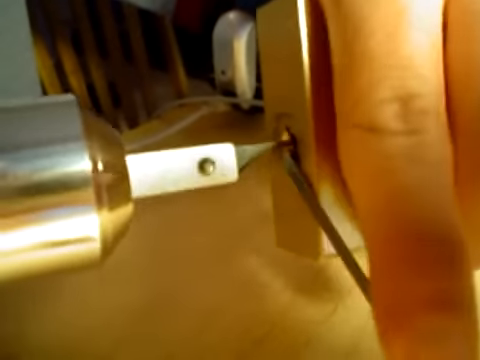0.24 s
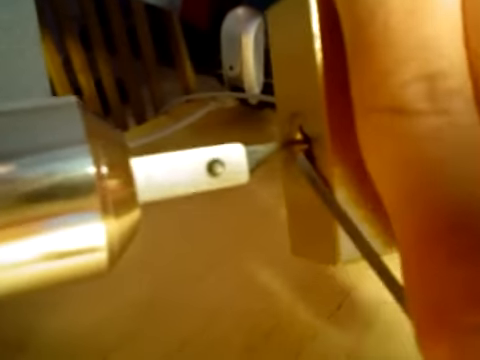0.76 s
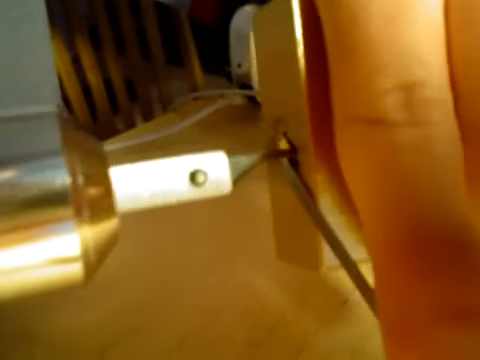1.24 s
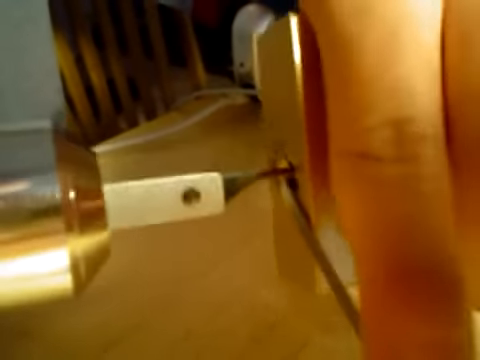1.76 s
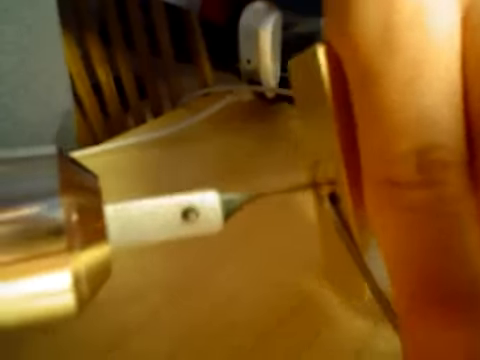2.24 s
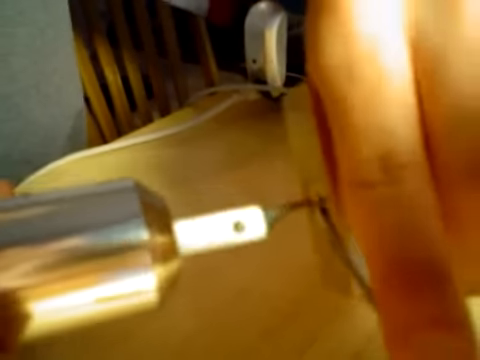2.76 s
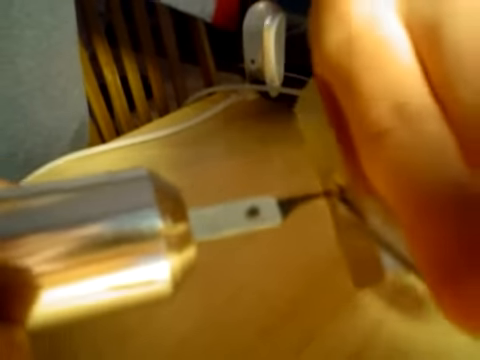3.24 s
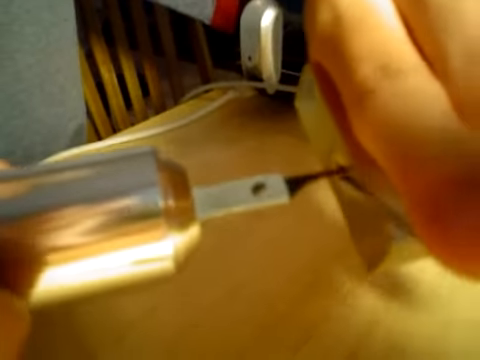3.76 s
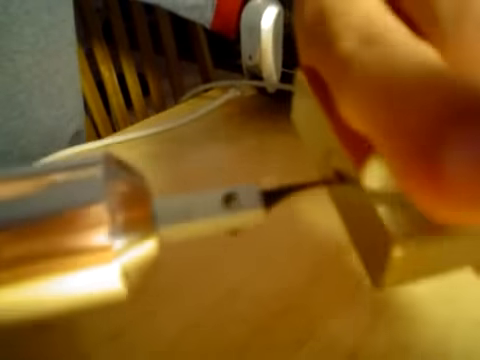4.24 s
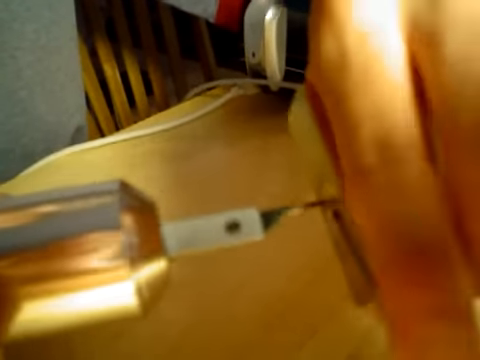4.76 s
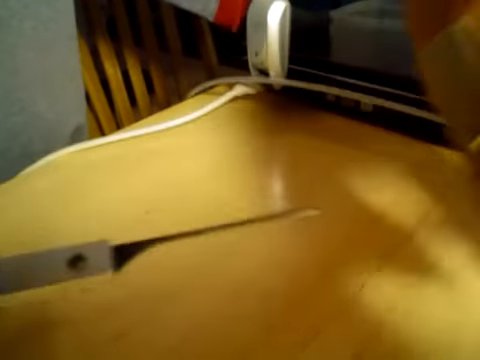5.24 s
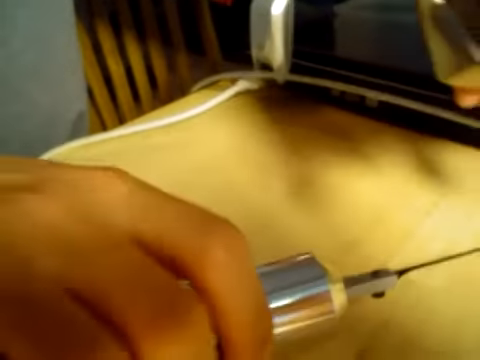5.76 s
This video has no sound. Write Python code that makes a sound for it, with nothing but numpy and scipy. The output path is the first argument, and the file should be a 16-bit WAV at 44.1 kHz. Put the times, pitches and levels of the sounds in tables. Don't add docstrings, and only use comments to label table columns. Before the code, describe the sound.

Close up in a quiet room, a handheld electric pick is pulsed in a brass padlock. Eleven brief, loud metallic rattles come about twice a second, each spinning up from a stray click and coasting down into slower ticks. After five seconds the tool slides faintly and drops on a wooden table with a sharp knock. A small, overloaded camera microphone adds light hiss.

```python
import sys
import numpy as np
from scipy import signal
from scipy.fft import rfft, irfft, next_fast_len
from scipy.io import wavfile
from scipy.ndimage import uniform_filter1d, minimum_filter1d

SR = 44100
rng = np.random.default_rng(int(sys.argv[2]) if len(sys.argv) > 2 else 0)


def waveform_to_disk(signal):
    frames = np.transpose(np.atleast_2d(signal))
    scaled = np.clip(frames, -1, 1) * 32767
    samples = np.round(scaled).astype(np.int16)
    wavfile.write(sys.argv[1], SR, samples)


def volts_from_db(level):
    exponent = np.asarray(level, float) / 20
    return 10 ** exponent


N = 264159


def cam():
    # first_flick_s, let_go_s, last_flick_s, top_speed [turns/s], share of it at first flick
    pulls = [(0.045, 0.163, 0.2, 90.1, 0.48), (0.424, 0.573, 0.611, 96.7, 0.52),
             (0.905, 1.043, 1.062, 94.1, 0.44), (1.284, 1.405, 1.449, 93.7, 0.4),
             (1.711, 1.739, 1.776, 102.3, 0.68), (2.097, 2.324, 2.377, 109.9, 0.6),
             (2.799, 2.949, 3.008, 105.4, 0.56), (3.339, 3.512, 3.565, 100.0, 0.56),
             (3.856, 4.065, 4.078, 93.4, 0.44), (4.397, 4.598, 4.658, 114.7, 0.36),
             (4.915, 5.012, 5.032, 78.6, 0.6)]
    # start_s, level_db
    missed = [
        (3.988, 6),
        (3.998, -15),
        (4.948, -2),
        (4.975, -6),
    ]
    # multiple, level_db
    harmonics = [(1, -67), (2, -52), (3, -54), (4, -53), (5, -54), (6, -48), (7, -47), (8, -47), (9, -49),
                 (10, -46), (11, -48), (12, -46)]
    run_up_s, coast_s = 0.025, 0.09
    press_db, first_extra_db = -9.5, 0.5
    sag_db_per_s, coast_loss_db = 5.5, 4
    first_body_db = 2.5
    swing_back_s, swing_back_turns = 0.0022, 0.21
    rows, whine = [], np.zeros(N)
    for start, let_go, end, top, share in pulls:
        at = np.arange(int(start * SR), int(end * SR))
        t = at / SR
        lag = np.exp((start - t) / run_up_s)
        coasted = np.maximum(t - let_go, 0) / coast_s
        speed = top * (1 - (1 - share) * lag) * np.exp(-coasted)
        turns = np.cumsum(speed) / SR
        hits = np.interp(np.arange(int(turns[-1]) + 1), turns, t) + 0.0003
        luck = rng.standard_normal((40, 6))[:len(hits)]

        strength_db = press_db + first_extra_db * lag - sag_db_per_s * (t - start) - coast_loss_db * coasted
        level_db = np.interp(hits, t, strength_db)
        for miss, change_db in missed:
            level_db = level_db + change_db * (np.abs(hits - miss) < 0.004)
        period = 1 / np.interp(hits, t, speed)
        body_db = by_depth(-3, -0.8, start) + first_body_db * np.interp(hits, t, lag)
        rows += zip(hits + 0.00005 * luck[:, 0], level_db + 1.3 * luck[:, 1], body_db, 1 + 0 * hits)

        firm_s = hits + swing_back_s + period * (swing_back_turns + 0.05 * luck[:, 2])
        firm_db = level_db + by_depth(-4.5, -6.5, start) + 1.8 * luck[:, 3]
        rows += zip(firm_s, firm_db, body_db, 0 * hits)
        light_s = hits + period * (0.24 + 0.07 * luck[:, 4])
        rows += zip(light_s, level_db - 12 + 3 * luck[:, 5], body_db, 0 * hits)

        grip = volts_from_db(by_depth(-5, 0.5, start))
        swell = np.hanning(len(at)) ** 0.59 * (speed / 100) ** 0.49 * grip
        whine[at] += swell * sum(volts_from_db(db) * np.sin(2 * np.pi * k * turns + k * k) for k, db in harmonics)
    return np.array(rows), whine


def flicks():
    # start_s, level_db, rebound_ms
    lurches = [(.0167, -13, 9.5), (.401, -15, 8.1), (.891, -26, 5.9), (1.2583, -16, 11.5),
               (1.6148, -15.5, 10.2), (1.6435, -10.5, 8.8), (1.6645, -15, 4.4), (1.679, -12, 4.7),
               (2.0605, -14, 8.9), (2.7759, -15, 10.5), (3.3111, -15.5, 14.7), (4.8886, -10.5, 7.7)]
    # start_s, level_db, rebound_ms
    coasting = [(.2176, -14, 3.9), (.2492, -16.5, 9.8), (.624, -12.5, 7.3), (.6515, -15, 13),
                (1.0766, -17, 7.4), (1.1002, -12, 7.9), (1.1443, -18.5, 6.9), (1.4726, -15.5, 8.8),
                (2.3928, -13, 10), (2.4233, -19, 13), (3.0196, -10.5, 6.7), (3.0564, -17.5, 12),
                (4.6775, -13, 14.5)]
    # start_s, level_db
    ticks = [(0.2377, -23), (0.6752, -25.5), (0.7263, -27), (0.8204, -33.5), (0.864, -23), (1.7844, -25),
             (1.799, -16), (1.8314, -26.5), (1.9832, -38.5), (2.086, -13.5), (2.588, -31.5), (3.1062, -28),
             (3.582, -17.5), (3.6086, -22), (3.6446, -26.5), (3.8224, -16), (3.8476, -18.5), (4.0994, -8),
             (4.134, -15.5), (4.182, -34.5), (4.2785, -41.5), (4.338, -25.5), (4.382, -29.5), (4.391, -27),
             (4.875, -22.5), (5.0479, -13.5), (5.0798, -21), (5.1398, -27)]
    rows = [(s, db, 5, 0.45) for s, db in ticks]
    for events, loss_db, body_db in ((lurches, 0.04, 0.5), (coasting, 0.92, 0)):
        for s, db, ms in events:
            rows.append((s, db, body_db, 0.45))
            rows.append((s + ms / 1000, db - loss_db * ms, body_db, 0.2))
    return np.array(rows)


def rattle(contacts):
    # pitch_hz, width_hz, level_db
    needle = [(3044, 710, -5.5), (4110, 490, 3), (5090, 2590, -6.5), (7265, 480, -1), (9550, 3640, -7.5),
              (9930, 240, -13.5)]
    # pitch_hz, width_hz, level_db
    lock = [(111, 90, -37), (312, 70, -19.5), (682, 143, -5.5), (905, 93, 0), (1406, 700, -7),
            (1862, 157, -0.5), (2570, 730, -6.5)]
    s, level_db, body_db, thrust = contacts.T
    tip_db = by_depth(1.5, -2.5, s)
    groups = (
        (volts_from_db(level_db + tip_db), needle[:2]),
        (volts_from_db(level_db), needle[2:]),
        (volts_from_db(level_db + body_db), lock),
    )
    out, clatter = 0, grains(1.8)
    for size, peaks in groups:
        for peak in peaks:
            share = size * volts_from_db(rng.normal(0, 1.6, len(s)))
            blow = uniform_filter1d(impulses(s + 0.00048, share), size=60)
            lead_in = decay(blow[::-1], 0.0016)[::-1]
            spray = decay(blow, 0.0015) + 0.055 * decay(blow, 0.006) + 0.24 * lead_in
            loose = min(peak[0] / 1800, 1)
            click = impulses(s + 0.001, size * (1.3 * loose + (10 - 6.8 * loose) * thrust))
            out = resonances(1.9 * loose * spray * clatter + click, [peak]) - out
    return out


def table():
    # start_s, ring_db, thud_db, crack_db
    knocks = [(5.521, -50, -30, -24.5), (5.553, -55, -37.5, -47), (5.616, -55, -44, -45),
              (5.661, -59, -53, -39), (5.833, -34, -35, -22), (5.836, -4, -17.5, -8.5),
              (5.8401, -14, -30, -47), (5.846, -19, -26, -29.5), (5.86, -29, -32, -25),
              (5.878, -21, -26.5, -40), (5.906, -22.5, -45, -44), (5.932, -19.5, -23.5, -26),
              (5.945, -23.5, -38, -52)]
    # pitch_hz, level_db, t60_s
    ring_modes = [(420, -8, 0.052), (513, -1, 0.073), (577, -2.5, .05), (643, -0.5, 0.056),
                  (751, -5.5, 0.051), (853, -3.5, .06), (950, -1.5, 0.051), (1040, -5.5, .05),
                  (1160, -3, 0.037), (1326, -5, .04), (1600, -3, 0.018), (1890, -14, 0.045),
                  (2790, -3, .018)]
    # pitch_hz, level_db, t60_s
    thud_modes = [(120, -9, .2), (190, -4, .12), (240, 0, .14), (292, -6, .1), (339, -6, .12)]
    # pitch_hz, level_db, t60_s
    barrel_modes = [(336, -6.5, 0.14), (639, -14, .1)]
    # start_s, level_db
    drag = [
        (5.5, -61),
        (5.53, -50),
        (5.6, -59),
        (5.75, -49),
        (5.83, -53.5),
        (5.88, -32),
        (5.93, -29),
        (5.958, -59),
        (5.99, -35),
    ]
    # pitch_hz, level_db
    slide_colour = [(100, -19.5), (250, -18), (340, 2), (650, 5.5), (950, -7), (1500, -2.5), (2500, -5),
                    (3800, -19.5), (4500, -27), (10000, -37)]
    s, ring_db, thud_db, crack_db = np.transpose(knocks)
    crack_colour = coloured([(300, 9.0), (2800, 3.5), (5500, -0.5), (10000, -26.0)])
    crack = decay(impulses(s, volts_from_db(crack_db)), 0.0038) * crack_colour
    rings = struck(s, ring_db, ring_modes) + struck(s, thud_db, thud_modes)

    when, slide_db = np.transpose(drag)
    grit = volts_from_db(2.1 * rms_one(uniform_filter1d(rng.standard_normal(N), size=300)))
    skid_starts = uniform_filter1d(impulses(s + 0.0047, volts_from_db(ring_db - 20)), size=200) * 100
    skids = decay(skid_starts, 0.017) / 100
    slide = volts_from_db(np.interp(np.arange(N) / SR, when, slide_db, left=-90))
    rubbing = (slide + skids) * grit * coloured(slide_colour)
    return crack + rings + rubbing + struck([5.838], 0, barrel_modes)


def judder():
    # start_s, end_s, pitch_hz, level_db
    hum_span = (5.65, 5.735, 405, -52.5)
    start, end, hz, level_db = hum_span
    t = np.arange(N) / SR
    gate = np.clip(np.minimum(t - start, end - t) / 0.012, 0, 1)
    return volts_from_db(level_db) * gate * wavering_tone(hz, 15)


def room(x):
    # pitch_hz, t60_s, level_db
    bands = [(300, 0.63, -46), (870, 0.16, -8), (2230, 0.39, -9.5), (5000, 0.099, -66.5),
             (9000, 0.078, -10.5)]
    t, tail = np.arange(SR // 2) / SR, 0
    for hz, t60, level_db in bands:
        edges = [hz * 0.11, min(hz * 1.36, 0.45 * SR)]
        band = signal.butter(1, edges, "band", fs=SR, output="sos")
        noise = signal.sosfilt(band, rng.standard_normal(len(t)))
        dying = noise * volts_from_db(-60 * t / t60) * np.minimum(t / 0.00075, 1)
        tail = tail + volts_from_db(level_db) * dying / np.sqrt(t60 * SR / 14)
    return signal.fftconvolve(x, tail)[:N]


def background():
    # pitch_hz, level_db
    air = [(15, 0), (30, -10), (60, -13.5), (120, -18), (200, -10), (350, -10), (520, -15.5), (1200, -16.5),
           (1700, -21), (2600, -23), (5000, -25.5), (10500, -28.5)]
    # pitch_hz, level_db
    fan = [(258.4, -64.5), (338, -68), (400, -70), (452.2, -65)]
    out = volts_from_db(-54) * coloured(air)
    for hz, level_db in fan:
        out += volts_from_db(level_db) * wavering_tone(hz, 8)
    return out


def by_depth(shallow, deep, seconds):
    # start_s, depth [0 shallow - 1 deep]
    depth = [
        (0.1, 0.24),
        (1.8, 0),
        (2.05, 0.35),
        (3.5, 0.98),
        (4.0, 0.98),
        (4.5, 1.07),
        (5.0, 0.77),
    ]
    return shallow + (deep - shallow) * np.interp(seconds, *np.transpose(depth))


def struck(seconds, level_db, modes):
    out = 0
    for hz, mode_db, t60 in modes:
        r, w = volts_from_db(-60 / (t60 * SR)), 2 * np.pi * hz / SR
        signs = rng.choice([-1, 1], len(seconds))
        blow_db = level_db + mode_db + rng.normal(0, 2, len(seconds))
        clicks = impulses(seconds, signs * volts_from_db(blow_db))
        out = out + signal.lfilter([0, np.sin(w)], [1, -2 * r * np.cos(w), r * r], clicks + 1e-18)
    return signal.sosfilt(signal.butter(2, [100, 3000], "band", fs=SR, output="sos"), out)


def resonances(x, peaks):
    out = 0
    for k, (hz, width, level_db) in enumerate(peaks):
        r = np.exp(-np.pi * width / SR)
        a = [1, -2 * r * np.cos(2 * np.pi * hz / SR), r * r]
        b = [(1 - r * r) / 2, 0, (r * r - 1) / 2]
        out = out + (-1) ** k * volts_from_db(level_db) * signal.lfilter(b, a, x + 1e-18)
    return out


def wavering_tone(hz, width_hz):
    once = resonances(rng.standard_normal(N), [(hz, width_hz, 0)])
    return rms_one(resonances(once, [(hz, width_hz, 0)]))


def coloured(points):
    hz, level_db = np.transpose(points)
    size = next_fast_len(N)
    bins = np.maximum(np.arange(size // 2 + 1) * SR / size, 1)
    gain = volts_from_db(np.interp(np.log(bins), np.log(hz), level_db))
    return rms_one(irfft(rfft(rng.standard_normal(size)) * gain, size)[:N])


def grains(spread_db):
    uneven_db = spread_db * np.minimum(rng.exponential(1, N), 3)
    return rms_one(rng.standard_normal(N) * volts_from_db(uneven_db))


def impulses(seconds, sizes):
    out = np.zeros(N)
    np.add.at(out, np.clip((np.asarray(seconds) * SR).astype(int), 0, N - 1), sizes)
    return out


def decay(x, seconds):
    return signal.lfilter([1], [1, -np.exp(-1 / (seconds * SR))], x + 1e-18)


def rms_one(x):
    return x / np.sqrt(np.mean(x ** 2) + 1e-20)


def scene():
    contacts, whine = cam()
    near = rattle(np.vstack([contacts, flicks()])) + whine + table() + judder()
    return (near + room(near) + background())[None]


def masked_detail(x, depth_db=20, slope_db=6.5):
    hz, _, z = signal.stft(x, SR, nperseg=256, noverlap=192)
    power = uniform_filter1d(uniform_filter1d(np.abs(z) ** 2, size=7, axis=0), size=3, axis=1)
    loudest = -minimum_filter1d(-power, size=27, axis=1, origin=1)
    limit_db = slope_db * np.log2(hz[:, None] / 4000 + 0.15) - depth_db
    limit = loudest * volts_from_db(2 * limit_db)
    kept = uniform_filter1d((power > limit) * 1.0, size=2, axis=1)
    return signal.istft(z * np.maximum(kept, 0.03), SR, nperseg=256, noverlap=192)[1][:N]


def band_limit(x):
    return signal.sosfilt(signal.butter(12, 10950, fs=SR, output="sos"), x)


def record(dry):
    x = masked_detail(np.clip(dry[0], -1.25, 1.25))
    x = signal.sosfilt(signal.ellip(10, 0.5, 55, 10050, fs=SR, output="sos"), x)
    return band_limit(np.clip(x, -1, 1)[None])


dry = scene()
out = record(dry)
waveform_to_disk(out)
```